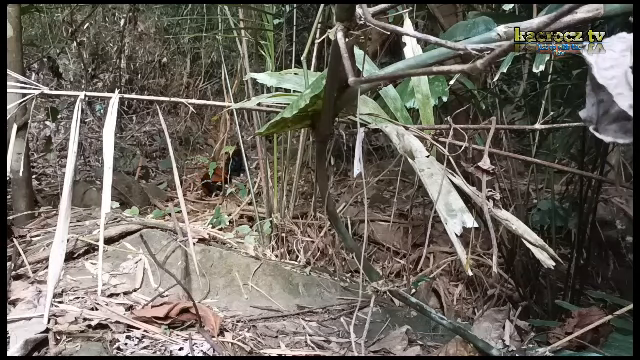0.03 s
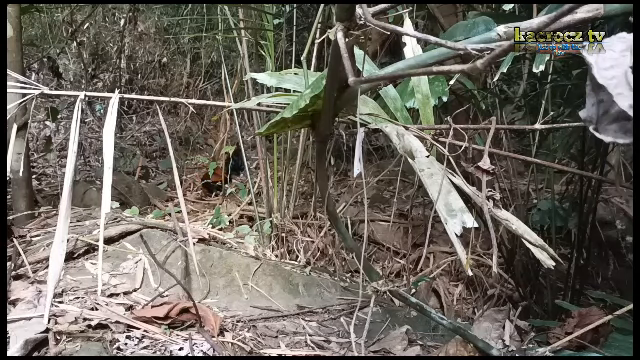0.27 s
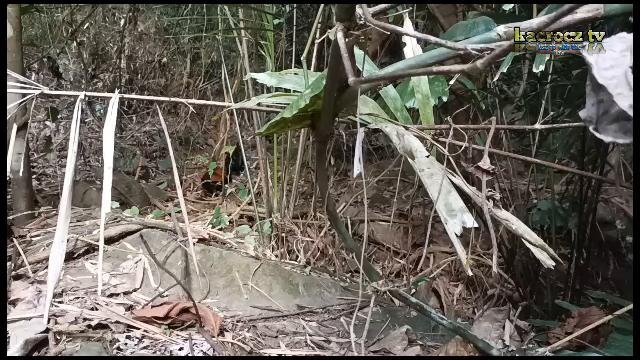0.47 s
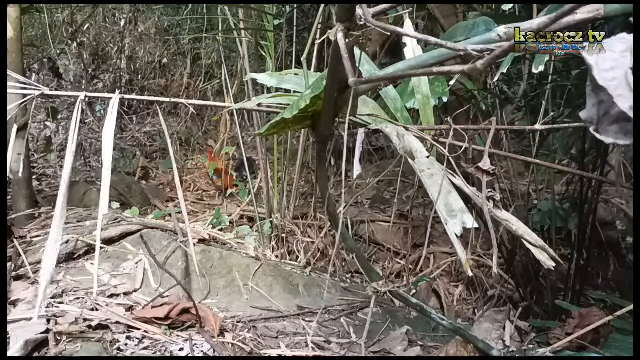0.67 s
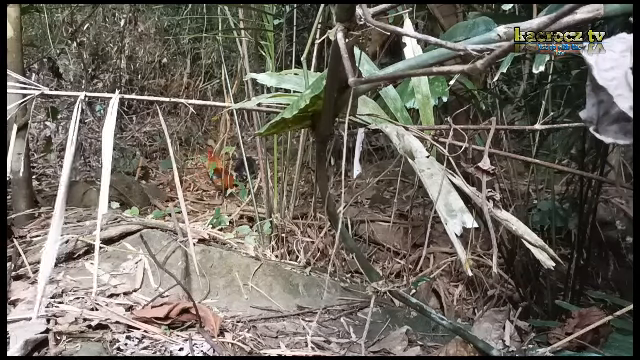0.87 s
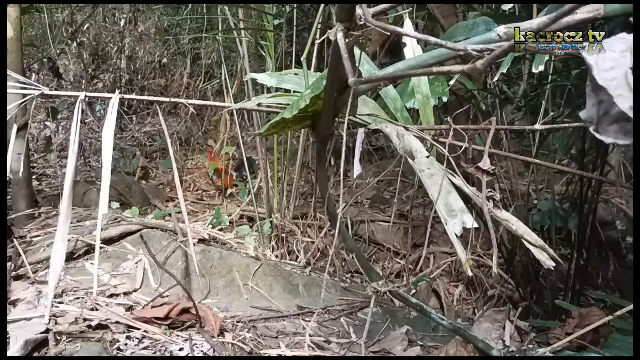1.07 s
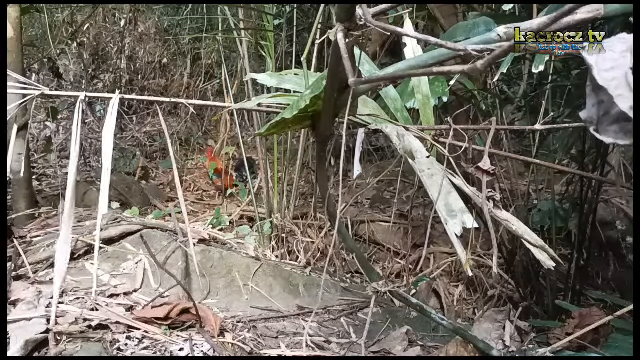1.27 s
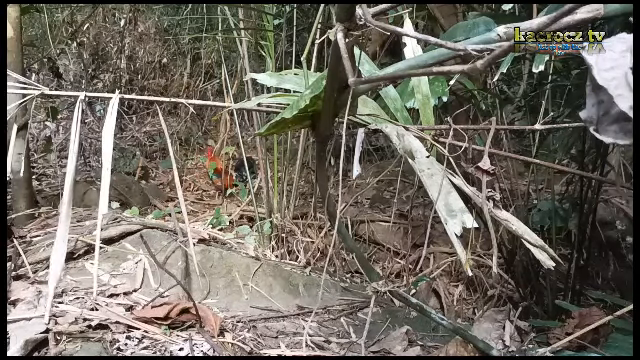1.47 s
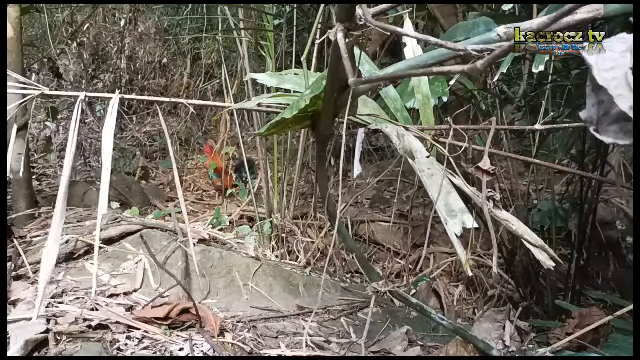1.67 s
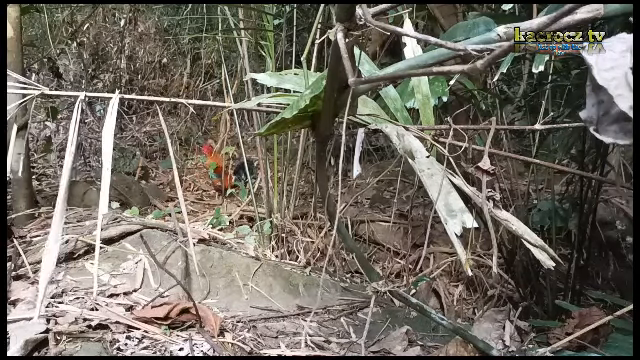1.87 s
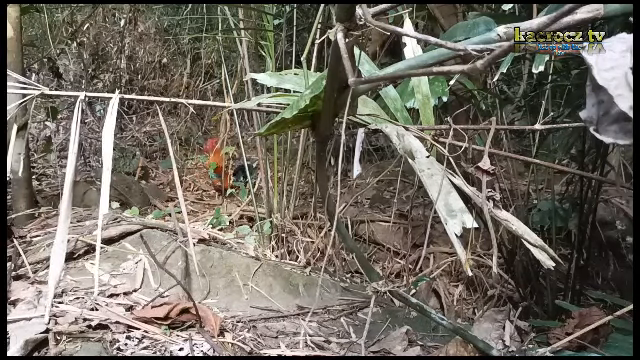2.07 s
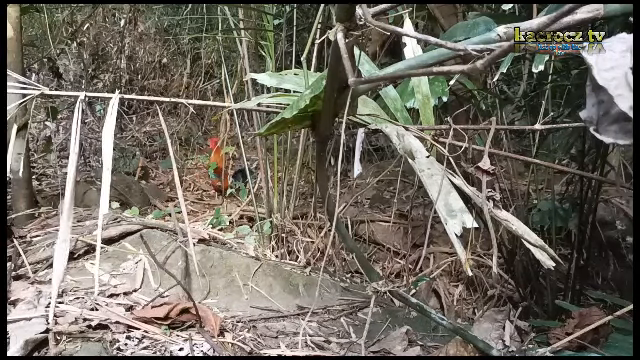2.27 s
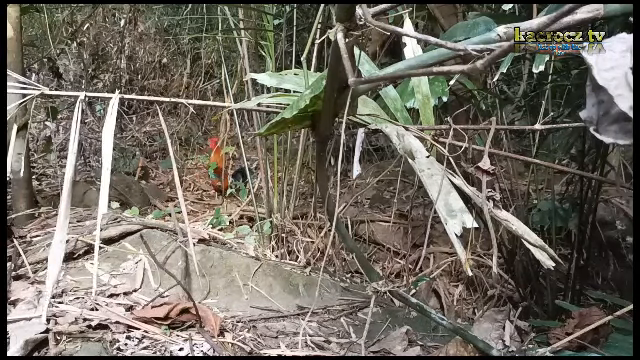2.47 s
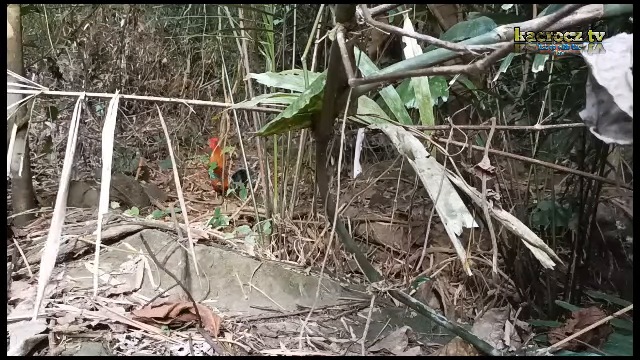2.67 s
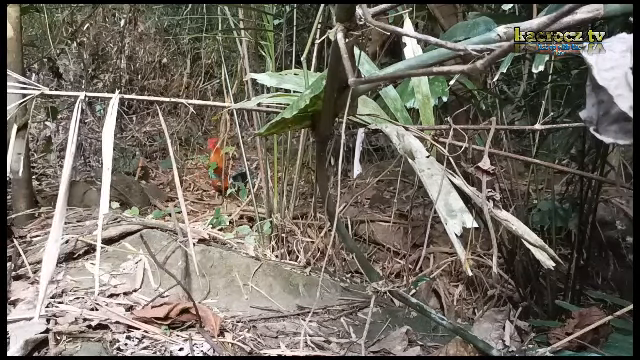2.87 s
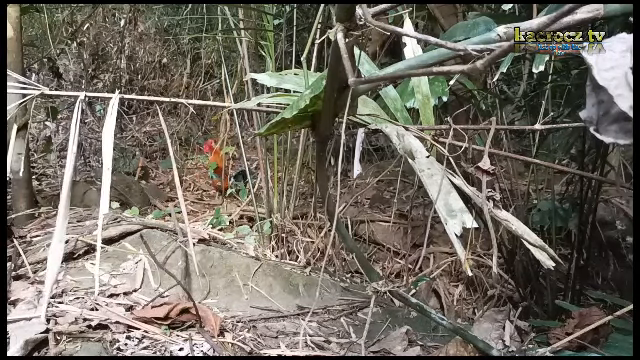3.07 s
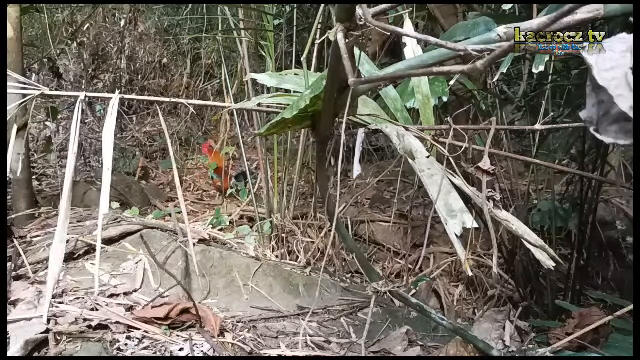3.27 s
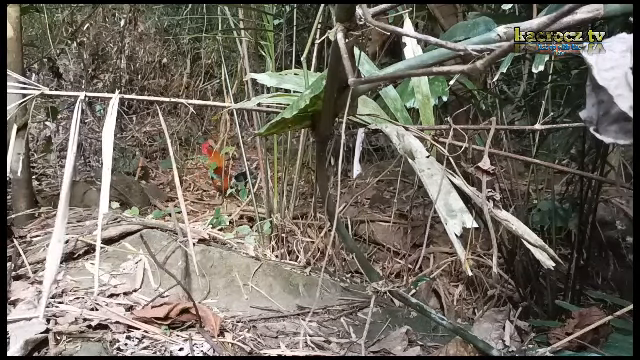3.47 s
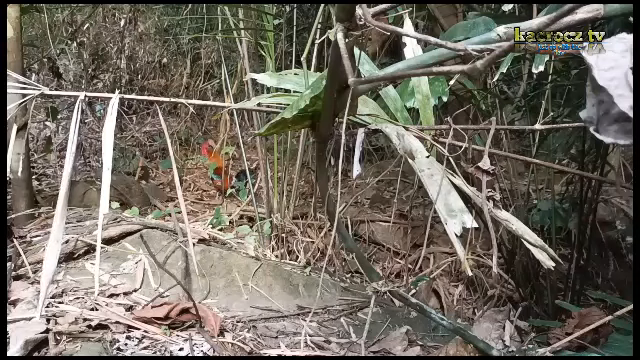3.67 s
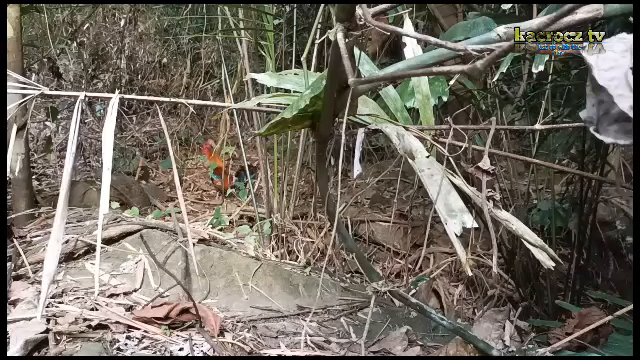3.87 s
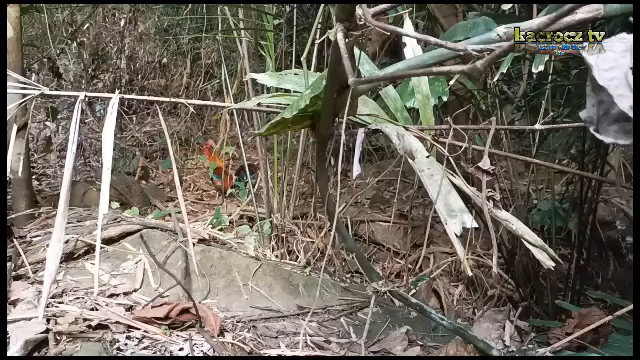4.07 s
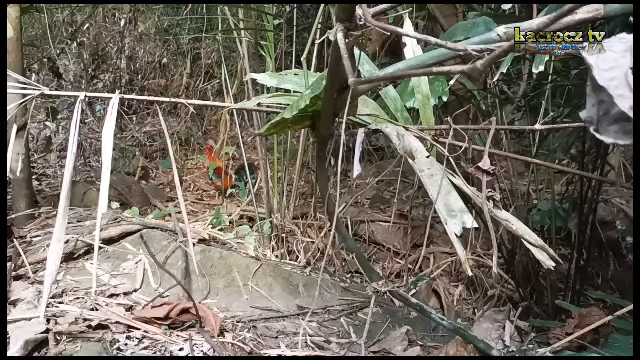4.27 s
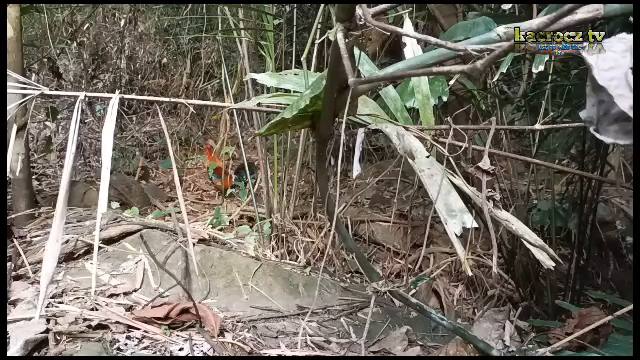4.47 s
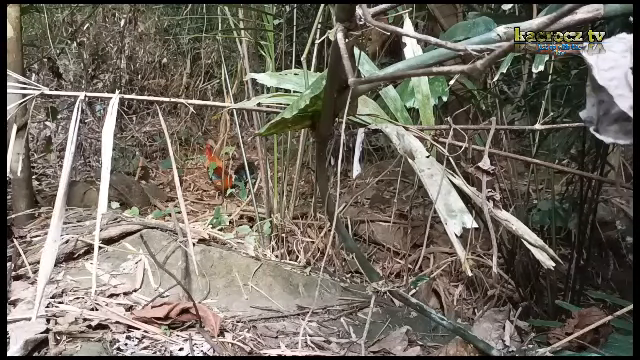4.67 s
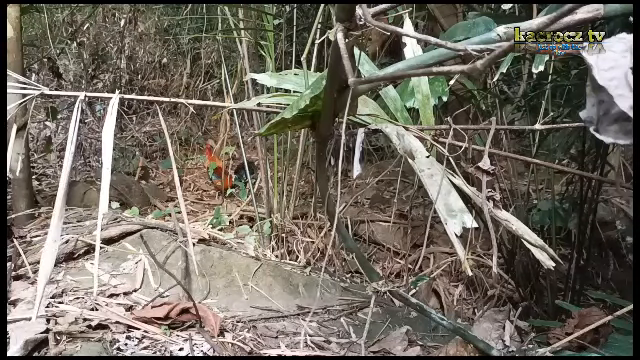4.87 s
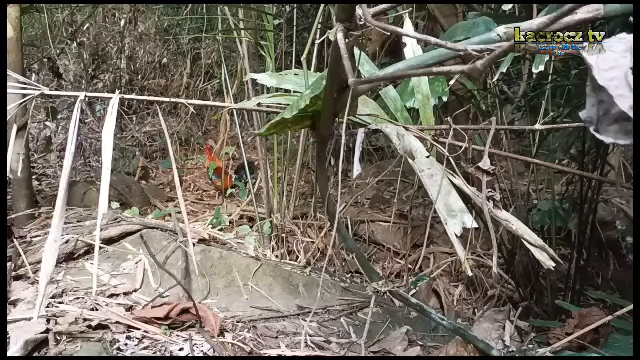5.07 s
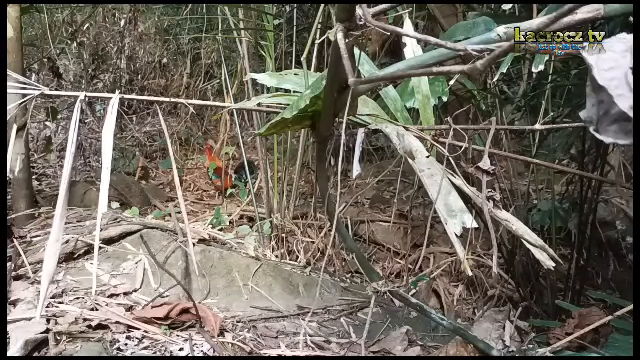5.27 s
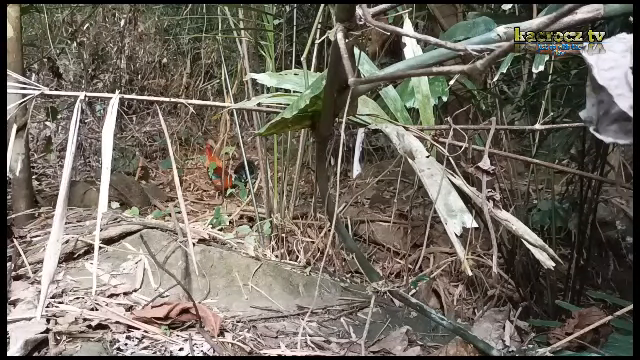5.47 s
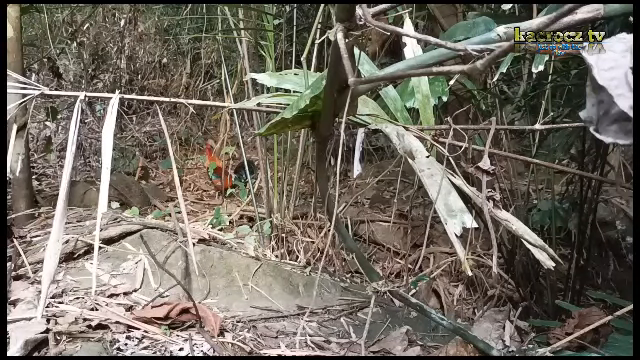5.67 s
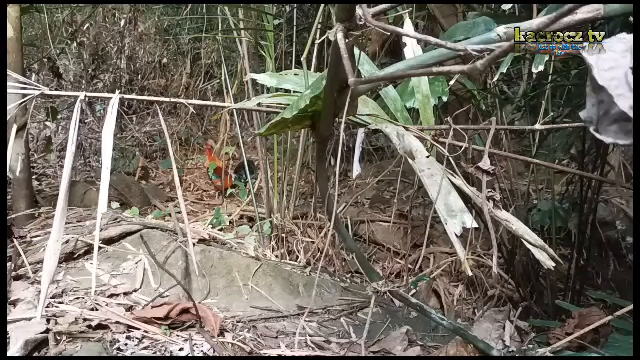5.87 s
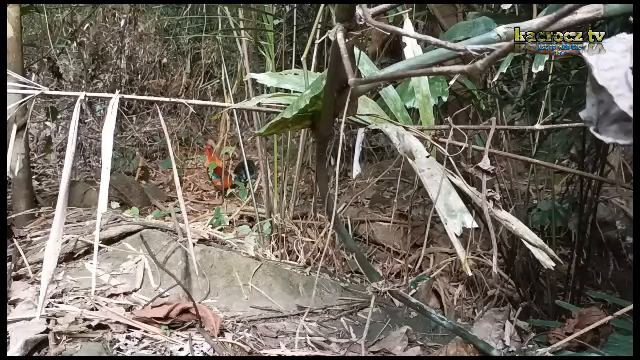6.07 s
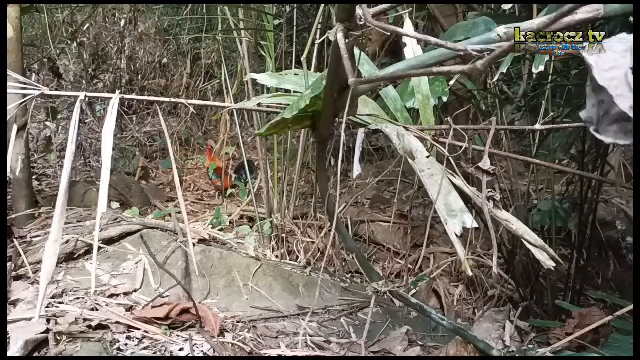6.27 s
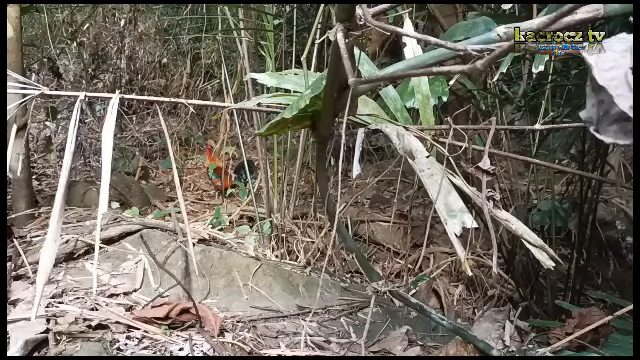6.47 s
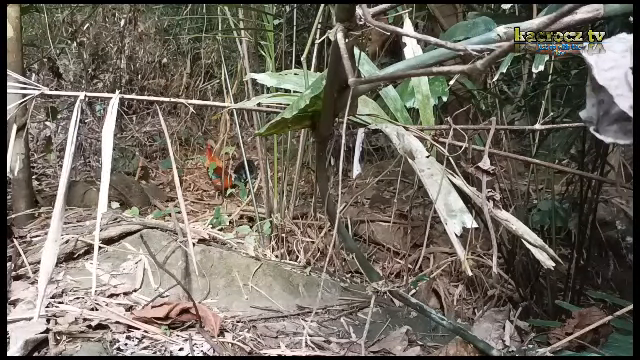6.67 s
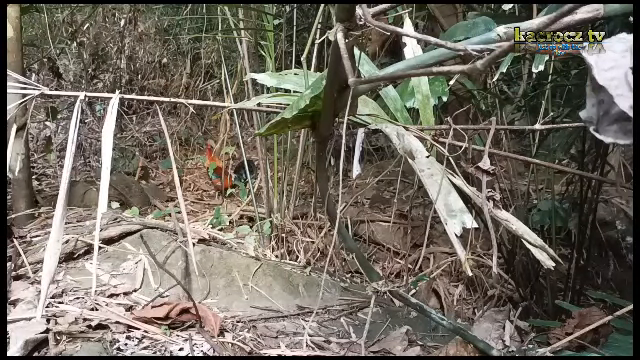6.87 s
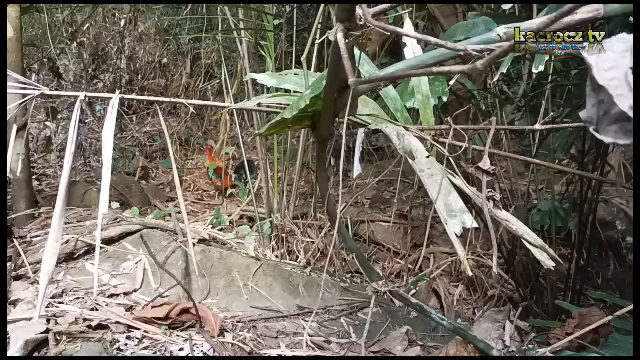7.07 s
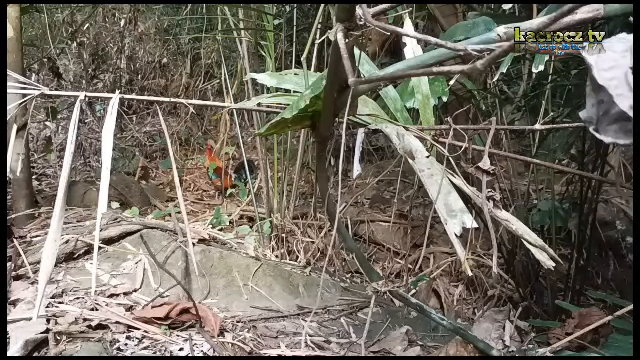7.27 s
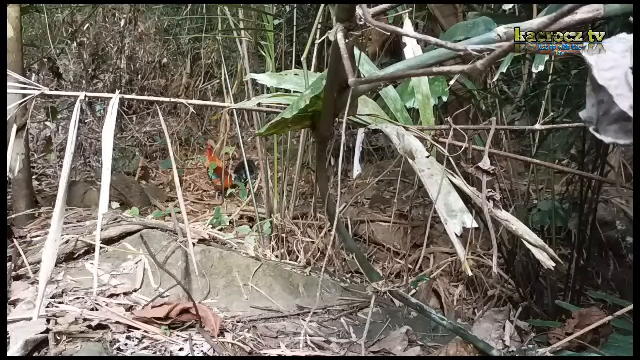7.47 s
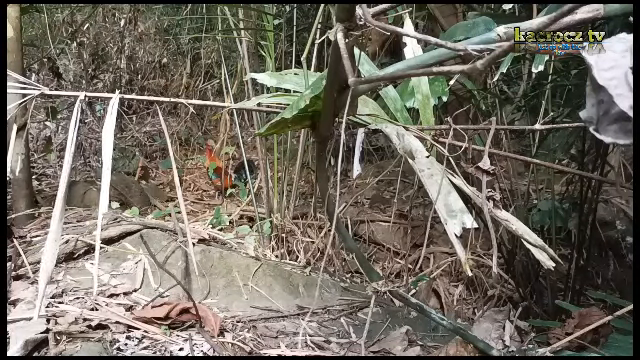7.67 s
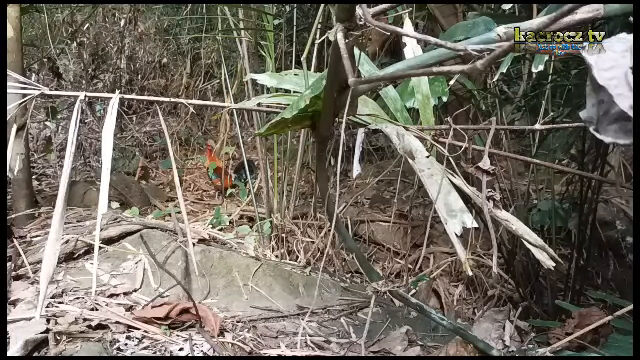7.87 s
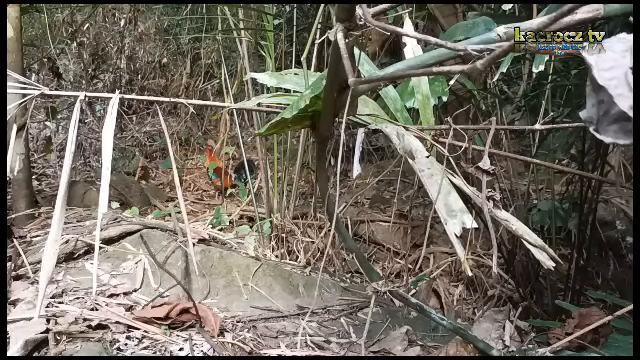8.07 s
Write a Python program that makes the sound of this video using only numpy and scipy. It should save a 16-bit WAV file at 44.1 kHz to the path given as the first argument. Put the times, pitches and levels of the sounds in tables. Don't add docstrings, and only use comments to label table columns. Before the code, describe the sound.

Forest ambience, picked up in stereo by a camera microphone. From 0 s a soft low air murmur, faint leaf stirrings and a thin cricket trill near 6 kHz surround quiet high seeps and piping birds. At 0.7 s the background cuts abruptly to a similar one, with soft warbles and pipes. At 2.1 s a rooster a few metres away crows loudly: two short hoarse syllables with brief clear whistles after the second, a long rasp from 2.6 to 3.2 s, then a rough burst at 3.4 s becoming a whistle that falls and breaks off at 3.8 s. Trunks return a short echo. From 4.2 to 5.5 s a nearer bird gives hooked and sliding whistles, with bright warbles around 5 s. Crickets swell from 5.5 to 6.8 s among thin notes. Faint hen clucks come at 4.7, 6.6 and 7.3 s. Whistles return from 7.3 s, shifting right, loudest near 7.9 s.

```python
import sys
import numpy as np
from scipy import signal
from scipy.fft import rfft, irfft, next_fast_len
from scipy.io import wavfile
from scipy.ndimage import uniform_filter1d, map_coordinates

SR = 44100
rng = np.random.default_rng(int(sys.argv[2]) if len(sys.argv) > 2 else 0)


def boost(x):
    u = np.asarray(x, float) / 20
    return 10 ** u


def inscribe(sig):
    pcm = np.round(np.clip(np.atleast_2d(sig).T, -1, 1) * 32767)
    wavfile.write(sys.argv[1], SR, pcm.astype(np.int16))


N = 358533
T = np.arange(N) / SR
SIDES = np.c_[[1, -1]]
CUT_S, FADE_IN_S = .707, .016
CROW = slice(2 * SR, 5 * SR)
SILENT_DB = -85

# (frequency [Hz], level [dB per Hz])
AIR_SPECTRUM = [(20, -34), (54, -4), (147, -2), (376, -9.5), (1730, -14.5), (2210, -12.5), (5080, -31.5),
                (15200, -47.5)]
# (frequency [Hz], correlation [1])
AIR_LIKENESS = [(40, 0.92), (100, 0.58), (300, 0.41), (1000, 0.72), (3000, 0.033), (10000, 0.066)]
# (time [s], hold [s], level [dB], attack [s], release [s])
LEAF_STIRS = [(0, .01, -78, .1, 0.079), (.08, .61, -86, .1, .07), (1.32, .01, -84, .07, 0.25),
              (4.9, 0.11, -79, 0.2, 0.39), (5.3, .12, -81, 0.23, .1), (5.49, .01, -75, 0.21, 0.16),
              (7.07, .04, -84, 0.089, .15), (7.39, .01, -80.5, 0.24, .15), (7.98, .01, -82, 0.13, .25)]
# (frequency [Hz], level [dB])
LEAF_SPECTRUM = [(2500, -28), (4500, -2.5), (7000, 3), (11000, -12.5), (15500, -16)]
# (frequency [Hz], time to fall 60 dB [s])
FOREST_DECAY = [(500, 0.73), (2000, 0.78), (5000, 1), (12000, 0.12)]
# (time [s], hold [s], level [dB], attack [s], release [s])
CRICKET_CHORUS = [
    (1.05, 0.62, -72.5, 1.1, 0.065),
    (4.1, 0.058, -78, 4.6, 0.63),
    (4.93, 0.26, -71, 0.13, 0.44),
    (6.9, .35, -74, 0.044, 0.19),
]
# (time [s], hold [s], level [dB], attack [s], release [s])
CRICKET_SINGER = [
    (0, 1.7, -72, .1, .2),
    (2.0, 2.1, -68.5, 0.067, .4),
    (4.2, 1.25, -84, 0.26, .1),
    (5.54, 1.27, -63.5, 0.35, 0.071),
    (7.25, 1.6, -74.5, 0.34, .1),
]
# (time [s], length [s], start [Hz], end [Hz], level [dB])
SEEPER_NOTES = [(0, 0.17, 7600, 8010, -70), (.165, 0.14, 7200, 7700, -70.5),
                (4.52, 0.15, 7830, 7250, -65.5), (5.51, 0.12, 6700, 6970, -69),
                (5.76, 0.13, 7610, 7200, -60.5), (6.115, 0.057, 8400, 6860, -67),
                (6.385, 0.034, 9100, 7200, -68), (6.585, 0.067, 7700, 6840, -63),
                (6.82, 0.15, 7650, 6920, -61.5), (7.27, 0.045, 8270, 5580, -65.5),
                (7.66, 0.03, 8150, 6760, -69)]
# (time [s], length [s], start [Hz], end [Hz], level [dB])
PIPER_NOTES = [(.43, 0.12, 5140, 5150, -65), (.48, 0.03, 4300, 4100, -67.5), (1.28, 0.042, 4170, 3800, -69),
               (1.885, 0.039, 4730, 4180, -70), (.51, 0.12, 3810, 3686, -59), (1.2, 0.21, 5070, 5140, -67),
               (1.32, 0.128, 3820, 3633, -57), (1.83, 0.14, 5260, 5160, -67.5),
               (1.9, 0.19, 3810, 3785, -56), (4.37, 0.08, 4500, 5050, -65)]
# (time [s], length [s], start [Hz], end [Hz], level [dB])
WARBLER_NOTES = [(.72, 0.22, 2260, 2130, -80), (1.05, 0.14, 2950, 2695, -74),
                 (1.28, 0.062, 1970, 1963, -68), (1.58, 0.31, 2250, 2147, -72.5),
                 (4.03, 0.12, 2400, 2134, -68), (4.41, 0.027, 3050, 3060, -67),
                 (4.445, 0.12, 2866, 2690, -59.5), (4.872, 0.12, 3050, 2663, -46.5),
                 (5.195, 0.095, 2910, 2616, -49.5), (5.235, 0.13, 2525, 2400, -49),
                 (5.27, 0.086, 2350, 2210, -53.5), (6.055, 0.035, 1900, 2400, -58),
                 (6.285, 0.02, 2000, 1650, -58), (6.44, 0.11, 2500, 2924, -67.5),
                 (6.645, 0.021, 2720, 2280, -56), (6.8, 0.11, 2760, 2310, -69),
                 (6.92, 0.025, 1800, 1733, -62), (6.975, .055, 1800, 1760, -63),
                 (7.12, 0.028, 1730, 1690, -64), (7.185, 0.158, 2650, 2458, -59.5),
                 (7.21, 0.14, 2344, 2200, -61), (7.17, .03, 1970, 1500, -64), (7.3, 0.061, 1780, 1700, -63),
                 (7.385, 0.13, 2760, 2500, -59.5), (7.42, 0.1, 2382, 2190, -61),
                 (7.52, 0.085, 2383, 2053, -57), (8.1, 0.028, 2800, 2780, -64),
                 (4.74, 0.095, 2705, 2740, -61.5), (8.085, 0.046, 3070, 2980, -68)]

# (time [s], hold [s], effort [dB], attack [s], release [s])
RASP_BOUTS = [
    (2.107, 0.012, -37.5, .005, .02),
    (2.122, 0.12, -25, 0.032, 0.12),
    (2.357, 0.085, -24.5, 0.015, 0.073),
    (2.45, 0.053, -38.5, .05, .05),
    (2.52, 0.015, -24, 0.05, 0.078),
    (2.613, 0.48, -25.5, 0.08, 0.19),
    (3.39, 0.078, -28, 0.11, 0.07),
    (3.5, 0.049, -45, 0.041, 0.53),
]
# (time [s], hold [s], level [dB], attack [s], release [s])
THROAT_OPENINGS = [
    (2.118, 0.14, -43.5, 0.018, 0.13),
    (2.36, 0.13, -46, 0.015, 0.15),
    (2.49, 0.069, -47, .06, 0.11),
    (2.62, 0.46, -49, 0.065, 0.16),
    (3.41, 0.099, -44.5, 0.17, .06),
    (3.5, 0.25, -48, .05, 0.13),
]
# (frequency [Hz], width [Hz], level [dB])
THROAT_MODES = [
    [(735, 165, -19.5), (950, 61, -14.5), (1700, 125, 9.5), (1980, 93, 4.5), (2440, 124, -3),
     (3050, 240, -55), (3600, 120, -26), (6540, 890, -30), (7200, 950, -30), (9150, 280, -54),
     (10150, 280, -50), (11500, 400, -49), (12600, 500, -51), (14200, 300, -58)],
    [(930, 150, -9), (1653, 233, 4), (1989, 155, 5.5), (2500, 131, 1), (2960, 140, -24), (3813, 160, -12),
     (4620, 1300, -44), (6750, 1500, -37.5), (7600, 480, -34), (8010, 140, -22.5), (9270, 170, -30.5),
     (9900, 270, -44.5), (10900, 230, -43.5), (11700, 290, -42.5), (12300, 200, -46), (13100, 500, -44),
     (14100, 400, -41), (15050, 200, -47)],
    [(746, 360, -21), (1690, 183, 3), (1930, 65, 4.5), (2400, 114, -1), (2780, 180, -17), (4950, 210, -45),
     (7600, 770, -26.5), (10020, 210, -29.5), (11300, 350, -42), (8700, 340, -36), (12600, 300, -55),
     (14400, 400, -47)],
]
# (time [s], throat in use [index])
NECK_POSTURE = [
    (2.3, 0),
    (2.34, 1),
    (3.2, 1),
    (3.26, 2),
]
UPPER_NOTCH = [8900, 8650, 9250]
# (time [s], hold [s], depth [dB], attack [s], release [s])
RASP_STUTTER = [(3.4, .06, 9, .03, .02)]
# (time [s], frequency [Hz])
VOICE_PITCH = [
    [(2.405, 1195), (2.44, 1232), (2.5, 1236), (2.6, 1238)],
    [(3.39, 975), (3.415, 1003), (3.44, 978), (3.47, 962), (3.52, 974), (3.6, 938), (3.65, 919), (3.7, 905),
     (3.748, 891)],
]
# (time [s], frequency [Hz])
PITCH_BREAK = [(3.768, 560)]
# (time [s], level [dB])
WHISTLE_EFFORT = [
    [(2.405, -33), (2.43, -28), (2.47, -18.5), (2.495, -24), (2.515, -18.5), (2.53, -54)],
    [(2.525, -46), (2.55, -27), (2.575, -23), (2.595, -66)],
    [(3.39, -27), (3.5, -21.5), (3.535, -17), (3.55, -23), (3.588, -17.5), (3.613, -24), (3.71, -18.5),
     (3.757, -22.5), (3.8, -31)],
]
# (frequency [Hz], width [Hz], level [dB])
WHISTLE_MODES = [(813, 600, -5), (1257, 210, -0.5), (1881, 430, -0.5), (2465, 310, 2), (3710, 118, -6),
                 (5010, 400, -13.5), (7610, 500, -8.5), (9880, 700, -20.5)]
# (time [s], level [dB])
FUNDAMENTAL = [(2.52, 0), (2.53, -15), (3.43, -15), (3.455, 0), (3.6, 0), (3.7, -4)]
# (multiple [1], level under the partial leading their region [dB])
WEAK_PARTIALS = [(3, -44), (5, -20), (6, -27), (7, -16), (9, -18), (10, -30), (11, -19), (12, -19),
                 (13, -38), (14, -42), (15, -44)]
# (time [s], hold [s], depth [dB], attack [s], release [s])
UNEVEN_THIRDS = [(3.605, .085, -12.5, .09, .02)]
# (time [s], hold [s], depth [dB], attack [s], release [s])
UNEVEN_HALVES = [(3.715, .035, -18, .03, .02)]
# (frequency [Hz], width [Hz], level [dB])
UNEVEN_MODES = [(583, 680, -6), (1426, 450, 3), (2520, 140, 0), (3570, 670, 9), (7500, 4300, 10)]
# (frequency [Hz], phase [rad])
PORT_PHASE = [(0, 0), (2670, 1.86), (3270, 1.5), (4050, 10.5), (5340, 16.5), (7490, 18.5), (8610, 23),
              (15000, 38)]
# (frequency [Hz], level [dB])
PORT_LEVEL = [(380, 19.5), (1130, 0.5), (1630, 2), (2360, 2), (4920, -1), (7100, -15), (10300, 12.5),
              (14800, 13.5)]
# (frequency [Hz], level [dB])
TWIG_SCATTER = [(3000, 0.5), (8000, 6.5), (13000, -21)]

# (time [s], length [s], frequency [Hz], level [dB])
WHISTLER_HOOKS = [
    (4.235, 0.074, 1850, -54.5),
    (4.662, 0.0806, 1955, -45.5),
    (5.084, 0.098, 1950, -44.5),
    (7.705, 0.049, 1840, -45.5),
]
# (time [s], length [s], start [Hz], end [Hz], level [dB])
WHISTLER_SLIDES = [
    (4.462, 0.109, 2320, 2135, -48),
    (7.268, 0.13, 2100, 1960, -53),
    (7.62, 0.077, 2090, 2020, -48),
    (7.94, 0.1, 2310, 2150, -41.5),
    (5.36, 0.065, 2080, 1940, -61.5),
]
# (time [s], length [s], start [Hz], end [Hz], level [dB])
WHISTLER_LONG_SLIDE = [
    (5.355, .12, 2338, 2097, -45.5),
    (5.475, .07, 2128, 2084, -44),
]
# (time [s], change of left over right [dB])
WHISTLER_FLIGHT = [
    (7.45, 0),
    (7.6, -5.5),
]
# (time [s], peak level [dB], frequency [Hz])
HEN_CLUCKS = [
    (4.738, -65, 840),
    (6.647, -63.5, 1280),
    (7.292, -65.5, 1286),
]
# (frequency [Hz], spread [dB])
SHADOW_SPREAD = [(3000, 3), (9400, 3), (9900, 17)]
# (frequency [Hz], level against the neighbours [dB])
SHADOW_DEPTH = [(3000, -18), (4300, -15), (5500, -9), (6200, -14), (15000, -14)]


def unit(x):
    return x / np.sqrt(np.mean(x ** 2) + 1e-20)


def along(points, hz):
    f, v = np.transpose(points)
    return np.interp(np.log(hz + 1), np.log(f + 1), v)


def curve(*tables):
    s, value = np.transpose(np.vstack(tables))
    return np.interp(T, s, value)


def bouts(rows, rest_db, arch_db=0):
    out = np.full(N, float(rest_db))
    for s, hold, db, attack, release in rows:
        knots = s + np.cumsum([-attack, attack, hold / 2, hold / 2, release])
        levels = [rest_db, db - arch_db, db, db - arch_db, rest_db]
        out = np.maximum(out, np.interp(T, knots, levels))
    return out


def wobble(rate, t=T):
    return map_coordinates(rng.standard_normal(int(N * rate / SR) + 4), [t * rate])


def filtered(x, response):
    n = x.shape[-1]
    m = next_fast_len(n + SR // 2, real=True)
    return irfft(rfft(x, m) * response(np.fft.rfftfreq(m, 1 / SR)), m)[..., :n]


def modes(table):
    def resonance(f, centre, width):
        loss = 1j * f * width
        return (loss / (centre ** 2 - f ** 2 + loss)) ** 2
    return lambda f: sum(boost(db) * resonance(f, centre, width) for centre, width, db in table)


def placed(x, pan_db, lag):
    return filtered(x, lambda f: boost(pan_db / 2 * SIDES) * np.exp(-1j * np.pi * f * lag * SIDES))


def rush(spectrum, alike, patchy_db):
    z = signal.stft(rng.standard_normal((2, N)), nperseg=512)[2]
    patches = uniform_filter1d(uniform_filter1d(rng.standard_normal(z.shape[1:]), 6, 0), 14, 1)
    pair = signal.istft(z * boost(patchy_db * unit(patches)), nperseg=512)[1][:, :N]

    def mid_side(hz):
        turn = np.arccos(np.clip(along(alike, hz), -1, 1)) / 2
        return boost(along(spectrum, hz)) * np.array([np.cos(turn), np.sin(turn)])
    mid, side = filtered(pair, mid_side)
    return np.array([mid + side, mid - side]) / np.std(mid)


def forest_air():
    air = placed(rush(AIR_SPECTRUM, AIR_LIKENESS, patchy_db=0.76), pan_db=2.7, lag=-0.00026)
    murmur = boost(-58.5 + 0.3 * wobble(1.5)) * air
    leaf_db = bouts(LEAF_STIRS, rest_db=-89.5) + 8.0 + 1.9 * wobble(54)
    return murmur + boost(leaf_db) * rush(LEAF_SPECTRUM, [(5000, 0.26)], patchy_db=1.5)


def crickets():
    chorus_db = bouts(CRICKET_CHORUS, rest_db=-86)
    singer_db = bouts(CRICKET_SINGER, rest_db=-73)
    noise = rng.standard_normal((2, 2, N))
    chorus = filtered(noise[0] + 0.1 * noise[0, 0], modes([(6130, 190, 0)]))
    singer = filtered(noise[1] + 0.16 * noise[1, 0], modes([(6340, 170, 0)]))
    beat = np.cos(2 * np.pi * np.cumsum(41.8 + .4 * wobble(3)) / SR)
    depth_db = np.clip(1.6 * (singer_db + 70.5), 1, 12)
    throb = boost(depth_db * (beat - 1) / 2 + depth_db / 3)
    near = boost(singer_db + 0.5 - 5.3 * SIDES) * throb * unit(singer)
    return boost(chorus_db + 4.0) * unit(chorus) + near


def glides(notes, bend=2.8):
    share = np.array([0, .12, .3, .6, 1])
    paths = []
    for s, length, start, end, db in notes:
        hz = end + (start - end) * (1 - share) ** bend
        paths.append(np.c_[s + length * share, hz, db - 10 * abs(share - .4)])
    return paths


def song(paths, flutter):
    out = np.zeros(N)
    unsteady = 1 + flutter * wobble(120)
    for path in paths:
        s, hz, db = np.transpose(path)
        live = slice(int(max(s[0], 0) * SR), int(s[-1] * SR))
        t = T[live]
        turn = 2 * np.pi * np.cumsum(np.interp(t, s, hz) * unsteady[live]) / SR
        ends = np.clip(np.minimum(t - s[0], s[-1] - t) / 0.007, 0, 1)
        out[live] += np.sqrt(2) * ends * boost(np.interp(t, s, db)) * np.sin(turn)
    return out


def echoes(x, stretch, gap):
    hz, t, z = signal.stft(rng.standard_normal((2, SR)), SR, nperseg=256)
    decay_s = stretch * along(FOREST_DECAY, hz)[:, None]
    tail = signal.istft(z * boost(-60 * t / decay_s), SR, nperseg=256)[1]
    late = np.pad(x, (int(gap * SR), 0))[None]
    return signal.fftconvolve(late, tail / np.linalg.norm(tail[0]), axes=1)[:, :len(x)]


def afar(x, pan_db, lag, direct_db, near_db, far_db):
    def hear(part):
        scatter = echoes(part, stretch=0.2, gap=.003)[0]
        aimed = placed(boost(direct_db) * part + boost(near_db) * scatter, pan_db, lag)
        return aimed + boost(far_db) * echoes(part, stretch=0.89, gap=0.015)
    return np.hstack([hear(part) for part in np.split(x, [int(CUT_S * SR)])])


def seeper():
    seep = song(glides(SEEPER_NOTES), flutter=.009)
    return afar(seep, pan_db=-14.5, lag=0.00027, direct_db=-6.0, near_db=-7.0, far_db=0.5)


def piper():
    pipe = song(glides(PIPER_NOTES), flutter=0.011)
    return afar(pipe, pan_db=4.0, lag=-0.00025, direct_db=-9.0, near_db=-5.0, far_db=-4.0)


def warbler():
    warble = song(glides(WARBLER_NOTES, bend=2), flutter=.024)
    return afar(warble, pan_db=7.0, lag=-0.00044, direct_db=-2, near_db=-2.5, far_db=0.0)


def hoarse_voice():
    t = T[CROW]
    effort_db = bouts(RASP_BOUTS, SILENT_DB, arch_db=1.5)[CROW]
    upper_db = bouts(THROAT_OPENINGS, SILENT_DB, arch_db=9.5)[CROW]
    cycle = np.cumsum(960 * np.exp(.16 * wobble(500, t))) / SR
    slap = np.diff(np.floor(cycle), prepend=0) * boost(1.5 * rng.standard_normal(len(t)))
    breath = rng.standard_normal(len(t)) * (1 + np.cos(2 * np.pi * cycle))
    source = (unit(slap - slap.mean()) + 0.87 * unit(breath)) * boost(1.12 * wobble(180, t))
    neck = curve(NECK_POSTURE)[CROW]
    index = np.arange(len(t))
    drift = index + np.cumsum(.008 * wobble(25, t))
    bursts = np.cos(2 * np.pi * 128 * t + wobble(60, t))
    stutter = boost(bouts(RASP_STUTTER, 0)[CROW] * (bursts - .3) / 2)

    def gain(db):
        return boost(db) - boost(SILENT_DB)

    def lower(f):
        return 1 / (1 + (f / 5200) ** 12)

    def upper(f, notch_hz):
        notch = 1 - .95 * np.exp(-((f - notch_hz) / 280) ** 2)
        return notch / (1 + (5200 / (f + 1)) ** 12) / (1 + (f / 14800) ** 24)

    voice = 0
    for k, throat in enumerate(THROAT_MODES):
        ring = np.interp(drift, index, filtered(source, modes(throat)))
        low = unit(filtered(ring, lower))
        high = unit(filtered(ring, lambda f: upper(f, UPPER_NOTCH[k])))
        mix = boost(3) * gain(effort_db) * low + boost(1.5 * wobble(14, t)) * gain(upper_db) * high
        voice = voice + np.clip(1 - abs(neck - k), 0, 1) * mix
    return voice * stutter * boost(.7 * wobble(170, t))


def clear_voice(rows):
    t = T[CROW]
    hz = curve(*VOICE_PITCH)[CROW]
    lowest_hz = curve(*VOICE_PITCH, PITCH_BREAK)[CROW]
    effort = boost(curve(rows)[CROW])
    turn = 2 * np.pi * np.cumsum(hz * (1 + .0018 * wobble(150, t))) / SR
    turn = turn + .045 * np.clip((t - 3.62) / .07, .2, 1) * wobble(500, t)
    lead = {k: abs(modes(WHISTLE_MODES)(k * hz)) ** 2 for k in 2 ** np.arange(4)}
    slip = 2 * np.pi * np.cumsum(lowest_hz - hz) / SR
    break_hz = PITCH_BREAK[0][1]
    giving_way = (lowest_hz - break_hz) / (hz - break_hz)
    tone = lead[1] * boost(curve(FUNDAMENTAL)[CROW]) * np.sin(turn + slip) * giving_way
    tone = tone + sum(lead[k] * np.sin(k * turn) for k in (2, 4, 8))
    for k, db in WEAK_PARTIALS:
        tone = tone + lead[2 if k < 4 else 8] * boost(db + 3 * wobble(40, t)) * np.sin(k * turn)
    three = boost(bouts(UNEVEN_THIRDS, SILENT_DB)[CROW])
    two = boost(bouts(UNEVEN_HALVES, SILENT_DB)[CROW])
    pattern = three * (np.cos(turn / 3) + .3 * np.cos(turn * 2 / 3)) + two * np.cos(turn / 2)
    soft_ends = np.clip(np.minimum(t - rows[0][0], rows[-1][0] - t) / 0.023, 0, 1)
    tone = np.sqrt(2) * soft_ends * effort * tone
    uneven = 2 * tone * pattern * boost(0.84 * wobble(51, t))
    return tone + filtered(uneven, modes(UNEVEN_MODES))


def rooster():
    rasp = hoarse_voice()
    clear = sum(clear_voice(rows) for rows in WHISTLE_EFFORT)
    phase_hz, phase = np.transpose(PORT_PHASE)

    def ports(hz):
        left = boost(along(PORT_LEVEL, hz) / 2) * np.exp(.5j * np.interp(hz, phase_hz, phase))
        return left ** SIDES
    scattered = filtered(boost(-6) * rasp + boost(-13) * clear, lambda hz: boost(along(TWIG_SCATTER, hz)))
    twigs = echoes(scattered, stretch=0.17, gap=0.0037)
    trunks = boost(-18.5) * echoes(rasp + clear, stretch=0.7, gap=.05)
    out = np.zeros((2, N))
    out[:, CROW] = filtered(rasp + clear, ports) + twigs + trunks
    return out


def hooks(notes):
    share = np.array([0, .16, .8, 1])
    bend = np.array([0.058, 0.007, -0.007, 0.05])
    loss_db = np.array([2, 0, 0, 2.5])
    return [np.c_[s + length * share, hz * (1 + bend), db - loss_db] for s, length, hz, db in notes]


def whistler():
    paths = hooks(WHISTLER_HOOKS) + glides(WHISTLER_SLIDES, bend=6.5)
    paths = paths + glides(WHISTLER_LONG_SLIDE, bend=2.2)
    whistle = song(paths, flutter=0.0091)
    hillside = boost(-21.5) * np.pad(whistle, (int(0.12 * SR), 0))[:N]
    heard = afar(whistle + hillside, pan_db=7.0, lag=-0.00045, direct_db=0.0, near_db=-11, far_db=-11)
    return heard * boost(curve(WHISTLER_FLIGHT) / 2 * SIDES)


def hen():
    out = np.zeros(N)
    for s, db, hz in HEN_CLUCKS:
        t = np.clip(T - s, 0, None)
        swell = np.exp(1 - t / .005) * t / .005
        tone = np.sin(2 * np.pi * hz * t) + 0.68 * np.sin(4 * np.pi * hz * t)
        out += boost(db + 11.5) * swell * tone
    return placed(out, pan_db=5.5, lag=-0.00024)


def scene():
    air = forest_air() + crickets()
    small_birds = seeper() + piper() + warbler()
    return air + small_birds + rooster() + whistler() + hen()


def shadowed(x):
    hz, _, z = signal.stft(x, SR, nperseg=1024)

    def blur(v, bins, frames):
        return uniform_filter1d(uniform_filter1d(v, bins, axis=0), frames, axis=1)
    power = blur(np.mean(abs(z) ** 2, 0), 3, 3)
    spread = unit(blur(rng.standard_normal(power.shape), 6, 10))
    depth_db = along(SHADOW_DEPTH, hz)[:, None] + along(SHADOW_SPREAD, hz)[:, None] * spread
    shadow = blur(power, int(1700 / hz[1]), 1) * boost(2 * depth_db)
    quiet = uniform_filter1d(power.sum(0), size=23, origin=10) < boost(2 * -42)
    kept = (power > shadow) | (hz[:, None] < 3000) | quiet
    return signal.istft(z * kept, SR, nperseg=1024)[1][:, :N]


def roll_off(x):
    return signal.sosfilt(signal.butter(12, 15380, fs=SR, output="sos"), x)


def record(dry):
    fade = np.where(T < CUT_S, 1, np.clip((T - CUT_S) / FADE_IN_S, .05, 1))
    band = filtered(dry * fade, lambda hz: hz < 15420)
    mix = shadowed(band)
    return roll_off(mix)


dry = scene()
out = record(dry)
inscribe(out)
```